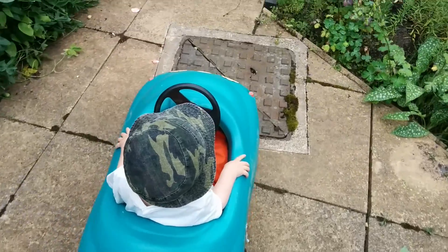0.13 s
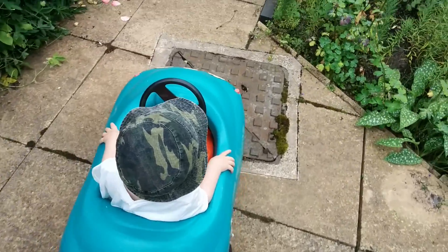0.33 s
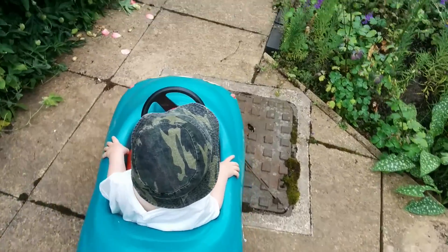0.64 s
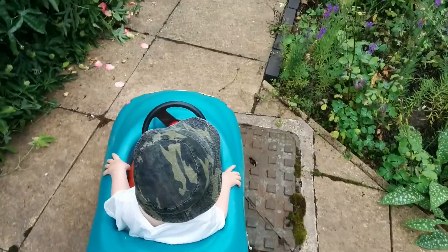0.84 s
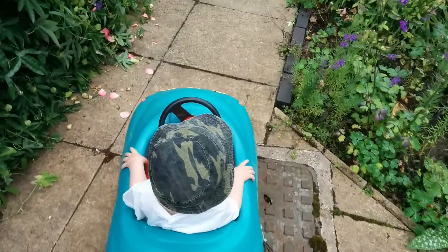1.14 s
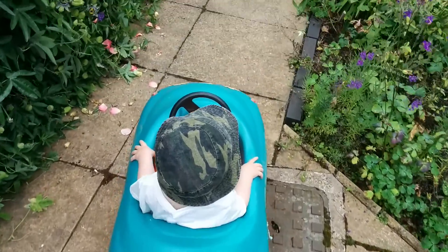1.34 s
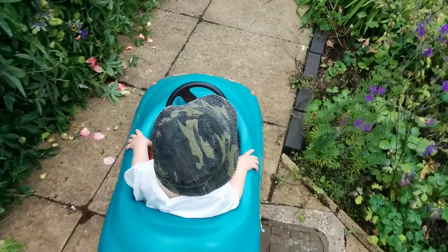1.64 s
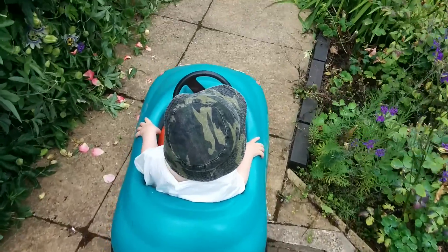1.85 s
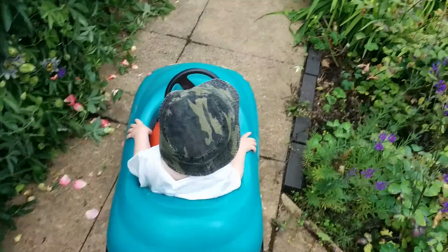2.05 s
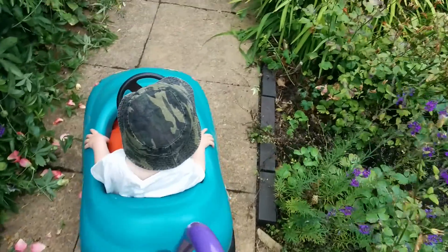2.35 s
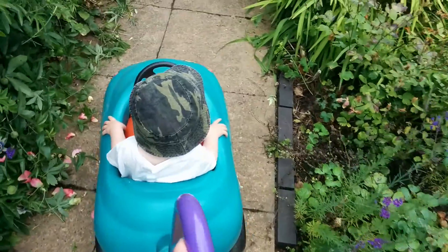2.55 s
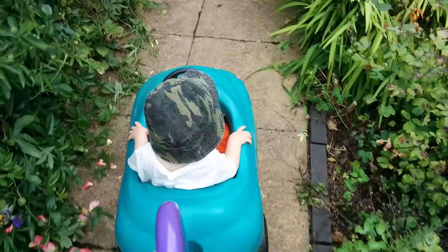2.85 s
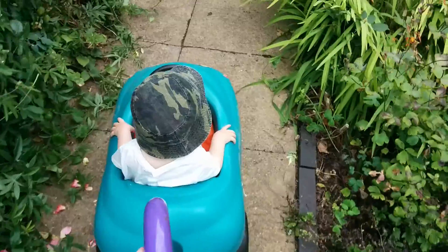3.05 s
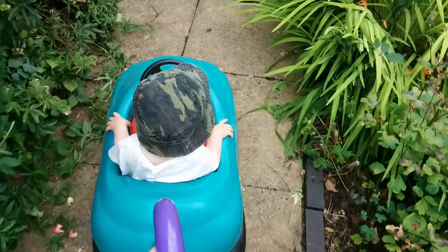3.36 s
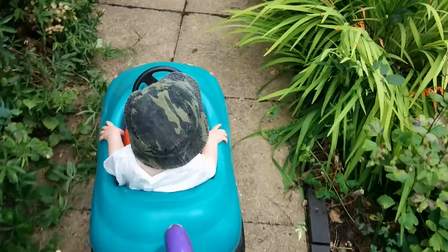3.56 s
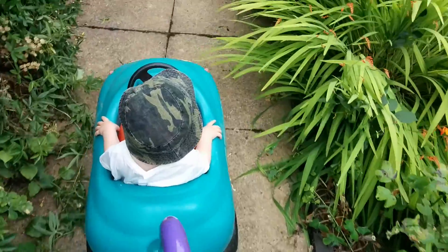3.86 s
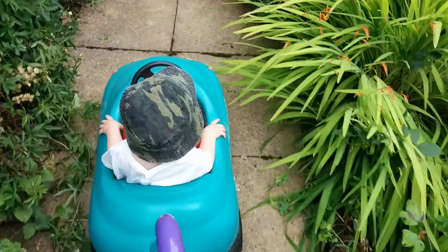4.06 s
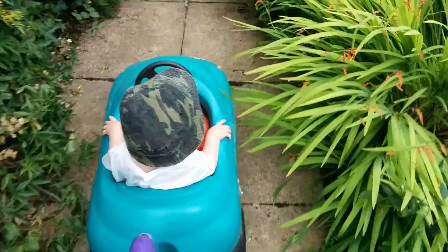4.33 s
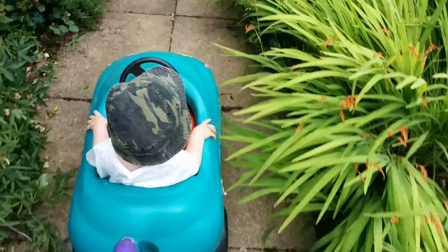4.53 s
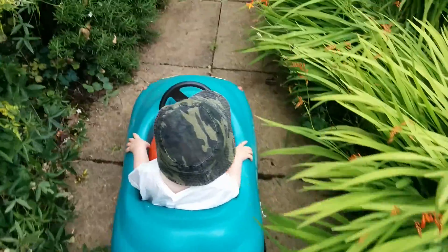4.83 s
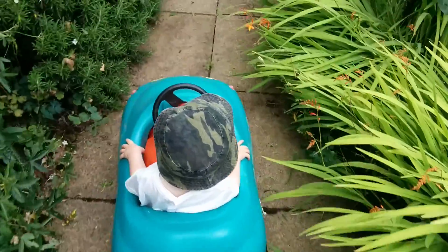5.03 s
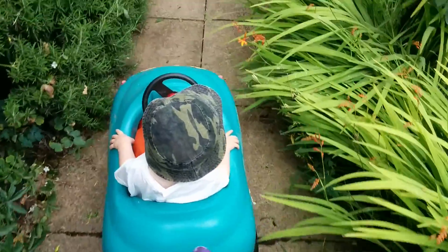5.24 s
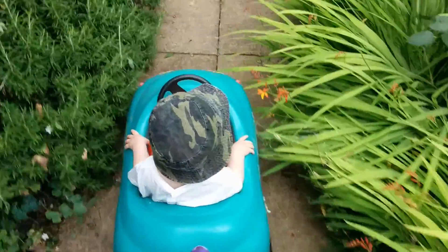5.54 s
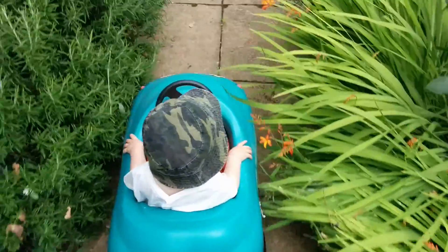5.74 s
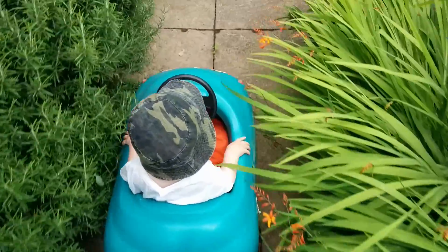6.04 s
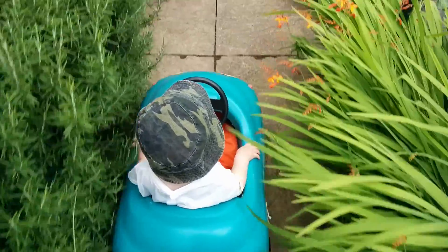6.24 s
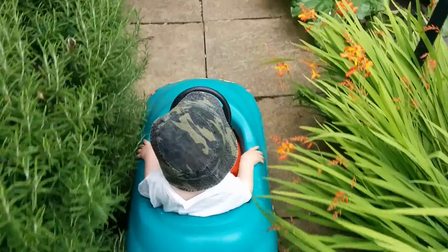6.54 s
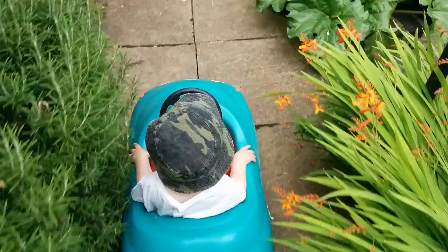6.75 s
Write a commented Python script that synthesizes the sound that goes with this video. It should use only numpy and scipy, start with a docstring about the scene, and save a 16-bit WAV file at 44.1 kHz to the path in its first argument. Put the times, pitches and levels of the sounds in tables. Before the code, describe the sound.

A hollow plastic toy car is pushed over rough garden paving, heard from just behind and above with no room echo. The wheels patter unevenly, thud into joints and crack bits of grit, while a dry axle rasps faintly. After a quieter, slower moment midway, the clattering resumes, and leaf blades brush the body with a fluttering, slightly singing hiss toward the end.

```python
"""A garden with concrete slabs in open air, no room; the microphone is just behind a child's ride-on push car.
Four hard plastic wheels chatter on rough stone, scuff and knock into joints: taps ring the hollow body, panels
and wheels as decaying modes and noise. An axle chafes as a wandering narrow band; sand grinds and grit cracks.
Long leaves brush the side as fluttering hiss, and resonances of the plastic sing."""
import sys
import numpy as np
from scipy import signal
from scipy.fft import rfft, irfft
from scipy.io import wavfile
from scipy.ndimage import uniform_filter1d

SR = 44100
rng = np.random.default_rng(int(sys.argv[2]) if len(sys.argv) > 2 else 0)


def wrap_up_sound(samples):
    """Save the sound to the file named by the first command line argument, as 16-bit audio."""
    columns = np.atleast_2d(samples).T
    # keep every value between -1 and 1, then stretch to whole-number steps
    tamed = np.clip(columns, -1, 1)
    steps = np.round(tamed * 32767).astype(np.int16)
    wavfile.write(sys.argv[1], SR, steps)


N = 303849
TIME = np.arange(N) / SR
RING = np.arange(10240) / SR  # time axis of one ring, s


def undb(db):
    """Decibels to gain."""
    return 10 ** (np.asarray(db) / 20)


def unit(x):
    """Scale to rms 1."""
    return x / np.sqrt(np.mean(x ** 2) + 1e-18)


def fade(t60):
    """A free decay of 60 dB in t60 seconds."""
    return np.exp(-np.log(1000) * RING / t60)


def add(out, start_s, sound):
    """Mix a sound in at start_s."""
    first = int(np.clip(start_s * SR, 0, N - 1))
    out[first:first + len(sound)] += sound[:N - first]


def spectrum(points, hz):
    """Read (Hz, dB) points on a log-frequency axis."""
    at_hz, level_db = np.transpose(points)
    return np.interp(np.log(hz), np.log(at_hz), level_db)


def noise(colour_db, lo_hz, hi_hz, size):
    """Rms 1 noise between two soft edges, coloured by a function from Hz to dB."""
    hz = np.arange(size // 2 + 1) * SR / size + 1e-3
    edges = np.sqrt(1 + (lo_hz / hz) ** 12 + (hz / hi_hz) ** 12)
    gain = undb(colour_db(hz)) / edges
    return unit(irfft(rfft(rng.standard_normal(size)) * gain, size))


def resonate(x, hz, width_hz):
    """One resonance, gain 1 at its centre."""
    return signal.lfilter(*signal.iirpeak(hz, hz / width_hz, fs=SR), x)


def wander(span_s):
    """A random wobble of rms 1, smoothed over span_s seconds."""
    return unit(uniform_filter1d(rng.standard_normal(N), max(int(span_s * SR), 1)))


def level(curve):
    """Gain along a (time_s, level_db) curve, silent outside it."""
    time_s, level_db = np.transpose(curve)
    inside = (TIME >= time_s[0]) * (TIME <= time_s[-1])
    return undb(np.interp(TIME, time_s, level_db)) * inside


PATCH_ATTACK_S, PATCH_RELEASE_S = 0.013, 0.013


def stretch(start_s, length_s):
    """How much of the wheels is on one stretch of stone, 0-1: a quick rise, a hold, a release."""
    corners_s = [-PATCH_ATTACK_S, 0, length_s, length_s + PATCH_RELEASE_S]
    return np.interp(TIME - start_s, corners_s, [0, 1, 1, 0])


# Clear modes of the moulded body, wheels and axles, undamped: pitch_hz [Hz], level_db [dB, relative],
# t60_s [s]
CAR_MODES = [(128.8, -2, 0.1), (155.7, -7, 0.31), (200.3, -2.5, 0.33), (241.3, 1, 0.33),
             (275.9, 14.5, 0.076), (298, 0, 0.16), (347.5, 12, 0.093), (396.4, -6, 0.29), (507, 18, 0.025),
             (589, 1, 0.16), (656.3, 2, 0.1), (740, 7.5, 0.089), (814, -0.5, 0.13), (1188, -3, 0.11),
             (1286, -7, 0.1), (1488, -1.5, 0.13), (1660, -3, 0.14), (1933, -2.5, 0.14), (2114, -6.5, 0.061),
             (2324, -19.5, 0.051), (2938, 1.5, 0.051), (3697, 15, 0.03), (5778, -2.5, 0.028),
             (6260, 6, 0.01), (7450, 3, 0.021)]
# The crowd of weaker modes between them: pitch_hz [Hz], density_db [dB per Hz, relative]
WEAK_MODES = [(40, -80), (75, -26), (130, -12), (260, -3), (400, -3), (600, -13), (1000, -14), (1900, -21),
              (2500, -26.5), (2900, -24), (3250, -25.5), (3700, -23), (4800, -36), (6300, -30.5),
              (8000, -32.5), (10500, -40), (16000, -32.5)]
# The parts of the car's voice, each one row: low_hz [Hz], high_hz [Hz], rise_s [s], t60_s [s, undamped],
# clear_share [power share of the clear modes, 0-1], patchiness_db [dB]
# the hollow body
BODY_PART = (35, 378, 0.0025, 0.15, 0.58, 2.6)
# the panels
PANEL_PART = (395, 1480, 0.00066, 0.1, 0.29, 2.8)
# the wheels
WHEEL_PART = (1520, 3420, 0.00049, 0.11, 0.14, 6.6)
# sand and grit
GRIT_PART = (3900, 12360, 0.00034, 0.046, 0.2, 3.5)


def strike(part, damping=1, centre_hz=2000, focus_db=0):
    """One part's answer to a tap; each contact point favours other modes. Rms 1 over the first 30 ms."""
    lo_hz, hi_hz, rise_s, t60_s, clear_share, patchy_db = part
    grid_hz = np.geomspace(60, 16000, 36)
    focus = np.exp(-(np.log2(grid_hz / centre_hz) / 0.18) ** 2)  # width in octaves
    favour_db = patchy_db * rng.standard_normal(len(grid_hz)) + focus_db * focus
    favour = np.column_stack([grid_hz, favour_db])

    modes = [mode for mode in CAR_MODES if lo_hz <= mode[0] < hi_hz]
    mode_hz, mode_db, mode_t60_s = np.transpose(modes)
    chance = rng.standard_normal((len(mode_hz), 2))
    detuned_hz = mode_hz * (1 + 0.014 * chance[:, 0])
    waves = np.sin(2 * np.pi * np.outer(detuned_hz, RING))
    strength = undb(mode_db + spectrum(favour, mode_hz)) * chance[:, 1]
    clear = strength @ (waves * fade(mode_t60_s[:, None] / damping))

    def crowd_db(hz):
        return spectrum(WEAK_MODES, hz) + spectrum(favour, hz)

    crowd = noise(crowd_db, lo_hz, hi_hz, len(RING)) * fade(t60_s / damping)
    clear_share = np.clip(clear_share, 0, 1)
    ring = np.sqrt(clear_share) * unit(clear) + np.sqrt(1 - clear_share) * unit(crowd)
    ring = ring * (1 - np.exp(-RING / rise_s))
    return ring / np.sqrt(np.mean(ring[:int(0.03 * SR)] ** 2))


def taps(count, spread_db):
    """Contacts at uneven moments, many light and a few hard: rows (time_s, size)."""
    chance = rng.random((count, 2))
    time_s = (np.arange(count) + 2 * chance[:, 0] - 1) * N / SR / count
    size = undb(-spread_db * np.log(np.maximum(chance[:, 1], 0.02)))
    return np.column_stack([time_s, size])


def chatter(part, contacts, skip_s, even_s):
    """The wheel skips four times at each contact; dividing by the local rms keeps the strength even."""
    spots = [strike(part) for _ in range(36)]
    sound = np.zeros(N)
    for time_s, size in contacts:
        ring = spots[rng.integers(len(spots))]
        for delay, push in rng.standard_normal((4, 2)):
            add(sound, time_s + skip_s * delay, size * push * ring)
    power = uniform_filter1d(sound ** 2, int(even_s * SR))
    return sound / np.sqrt(np.abs(power) + np.mean(power) / 100)


def rub(colour, flutter_db, swell_db):
    """Sliding friction: a hiss of countless tiny slips that flutters quickly and swells as grip changes."""
    grip_db = flutter_db * wander(0.00244) + swell_db * wander(0.02)
    hiss = noise(lambda hz: spectrum(colour, hz), 500, 17400, N)
    return unit(hiss * undb(grip_db))


# Coarse patches of stone under the wheels: start_s [s], length_s [s], lift_db [dB],
# extra_clatter_db [dB, from sharp stones], extra_sand_db [dB]
COARSE_PATCHES = [(0.26, 0.053, -2, 9.5, 16), (0.475, 0.1, 3, 5.5, 4), (0.65, 0.13, 8, 5.5, -1),
                  (1.184, 0.066, 6, 4, 8.5), (1.317, 0.057, -0.5, 12.5, 7), (1.397, 0.066, 3, 5.5, 8),
                  (1.615, 0.099, 5, 0.5, 3), (2.236, 0.087, 7, -9, 1.5), (2.457, 0.022, 4, -6, 1.5),
                  (2.66, 0.21, 8.5, -5, 1.5), (2.896, 0.12, 18, -2.5, -3.5), (3.032, 0.13, 5, -3, 5.5),
                  (3.325, 0.065, 6, 2.5, 9.5), (3.748, 0.026, 6, 1.5, -28), (4.12, 0.05, 8, -3.5, 0),
                  (4.401, 0.19, 8, 0.5, 0.5), (4.719, 0.034, 8, 6.5, -4), (4.875, 0.044, 9, 1, -5.5),
                  (5.115, 0.069, 11, -7, -24), (5.291, 0.1, 3, 5, 7), (5.468, 0.14, 2.5, 4.5, 0.5),
                  (5.567, 0.11, 6, -2.5, 3.5), (5.936, 0.054, 2, 2, 4), (6.001, 0.079, 5, 2, -3.5),
                  (6.257, 0.11, 1.5, 4.5, -6), (6.526, 0.11, 7, 0, -2), (6.8, 0.03, -1.5, 9, 9.5)]
# Smooth stretches where the wheels glide, mostly quieter: start_s [s], length_s [s], change_db [dB]
SMOOTH_STRETCHES = [(0.626, 0.072, 1.5), (0.863, 0.043, -7), (2.157, 0.024, -10.5), (2.395, 0.073, -8.5),
                    (2.862, 0.017, -11), (3.152, .11, -12.5), (3.549, 0.019, -6), (3.805, 0.0082, -4.5),
                    (4.024, 0.031, -6), (4.63, 0.06, -5.5), (5.108, 0.039, -7), (5.381, .035, -6.5),
                    (5.652, 0.069, -7.5), (5.825, 0.085, -4.5), (6.471, 0.017, -9), (6.748, 0.033, -6.5)]


def surface():
    """Coarse patches shake the car harder, smooth ones mostly calm it: dB for body, clatter and sand."""
    smooth_db = sum(change_db * stretch(start_s, length_s)
                    for start_s, length_s, change_db in SMOOTH_STRETCHES)
    body_db, clatter_db, sand_db = np.tile(smooth_db, (3, 1))
    for start_s, length_s, lift_db, sharp_db, sandy_db in COARSE_PATCHES:
        on = stretch(start_s, length_s)
        body_db += on * lift_db
        clatter_db += on * (lift_db + sharp_db)
        sand_db += on * (lift_db + sandy_db)
    return body_db, clatter_db, sand_db


LIGHT_FROM_DB = -11  # a panel knock this loud at a steady walk gives just dip_db, a louder one more


def contact(gap_s, dip_db, return_s):
    """A wheel runs light as it spans a joint: longer when the car is slow, deeper when it lands harder."""
    load_db = np.zeros(N)
    at_s, push_db, _ = np.transpose(PUSH)
    for time_s, panel_db, *_ in JOINT_KNOCKS:
        slow_db = CRUISE_DB - np.interp(time_s, at_s, push_db)
        span_s = gap_s * undb(0.5 * slow_db)
        depth_db = dip_db * undb(0.47 * (panel_db + slow_db - LIGHT_FROM_DB))
        side_s = np.where(TIME < time_s, span_s, return_s)
        dip = np.exp(-((TIME - time_s) / side_s) ** 4)
        load_db = np.minimum(load_db, depth_db * dip)  # the deepest dip wins
    return undb(load_db)


# drift is a fraction of the pitch
AXLE_HZ, AXLE_WIDTH_HZ, AXLE_DRIFT, AXLE_SPURT_DB, AXLE_WOBBLE_S = 6100, 760, 0.024, 7, 0.035


def axle():
    """Tiny slips ring the dry axle; pitch and pressure wander with the wobble of the wheel. Rms 1."""
    slips = noise(np.zeros_like, 0.91, AXLE_WIDTH_HZ / 2, N)
    hz = AXLE_HZ * (1 + AXLE_DRIFT * wander(AXLE_WOBBLE_S))
    pressure = undb(AXLE_SPURT_DB * np.minimum(wander(AXLE_WOBBLE_S), 1))
    return unit(slips * np.sin(2 * np.pi * np.cumsum(hz) / SR) * pressure)


BOOM_DB, PANEL_DB, WHEEL_DB, SAND_DB = -1.5, -8.5, -12.5, -1  # trim of each part
CRUISE_DB, CLATTER_GROWTH = -24.5, 0.85  # push at a steady walk; dB of clatter for each dB of push
# slow wheels favour the lowest modes: their band, and dB gained for each dB below the steady walk
DEEP_HZ, DEEPENING = (111, 194), 0.73
# The push speeding up and slowing: time_s [s], push_db [dB, before trims and surface],
# sand_db [dB under the wheels, before trim and surface]
PUSH = [(0.0, -26.5, -40.5), (0.33, -29, -50.5), (0.77, -42, -53), (1.06, -30.5, -52.5), (1.3, -29.5, -51),
        (1.82, -28, -38), (2.4, -32.5, -46.5), (2.78, -46.5, -60.5), (3.24, -46.5, -61.5),
        (3.55, -28, -44.5), (4.43, -27, -46), (4.62, -31, -40.5), (5.08, -28, -41), (5.3, -29, -47),
        (5.43, -24.5, -43), (6.43, -27.5, -39.5), (6.72, -26, -47), (6.89, -28, -50.5)]


def rolling():
    """Hard wheels patter over the stone, the axles rasp in their sockets and sand ticks underneath."""
    time_s, *columns = np.transpose(PUSH)
    push_db, sand_db = (np.interp(TIME, time_s, column) for column in columns)
    body_lift_db, clatter_lift_db, sand_lift_db = surface()
    clatter_db = CRUISE_DB + CLATTER_GROWTH * (push_db - CRUISE_DB) + clatter_lift_db
    grit_db = sand_db + sand_lift_db

    bumps = taps(count=380, spread_db=3.5)
    thuds = taps(count=270, spread_db=2.0)  # the body thuds at its own, sparser moments
    boom = chatter(BODY_PART, thuds, skip_s=0.003483, even_s=0.068)
    deep_band = signal.butter(2, DEEP_HZ, "band", fs=SR, output="sos")
    bass = signal.sosfiltfilt(deep_band, boom)
    boom = boom - bass + bass * undb(DEEPENING * (CRUISE_DB - push_db))
    boom = boom * undb(push_db + body_lift_db + BOOM_DB)

    panel = chatter(PANEL_PART, bumps, skip_s=0.003953, even_s=0.027) * undb(clatter_db + PANEL_DB)
    wheel = chatter(WHEEL_PART, bumps, skip_s=0.004, even_s=0.033) * undb(clatter_db + WHEEL_DB)
    grains = taps(count=1300, spread_db=6.5)
    sand = chatter(GRIT_PART, grains, skip_s=0.0018, even_s=0.066) * undb(grit_db + SAND_DB)
    # the rasp swells less than the sand, so it stands out when the car runs gently
    rasp = axle() * undb(0.8 * grit_db - 14)
    load = contact(gap_s=0.028, dip_db=-3.0, return_s=0.0092)
    return (boom + panel + wheel + sand + rasp) * load


def garden():
    """Faint outdoor air: steady noise, strongest in the bass."""
    air = [(30, 4), (150, -4), (1000, -52), (16000, -27)]  # (Hz, dB per Hz)
    return undb(-57) * noise(lambda hz: spectrum(air, hz), 20, 17000, N)


# Steered wheels grinding sideways over sand: time_s [s], level_db [dB]
SAND_GRIND = [(0, -36.5), (.12, -41.5), (.225, -39.5), (.26, -30), (.35, -36), (.43, -38), (.5, -74)]
# Pinches of fine sand crushed with a soft fizz: start_s [s], length_s [s], level_db [dB]
SAND_FIZZES = [(0.712, .02, -37.5), (1.033, 0.026, -56), (2.647, 0.023, -52), (2.736, 0.0096, -52),
               (2.82, 0.015, -54), (3.37, .02, -50), (3.616, .025, -37), (3.77, 0.016, -42),
               (4.216, 0.0068, -46), (4.555, 0.035, -54), (4.646, .012, -35), (4.97, .015, -58),
               (5.048, 0.0075, -44.5), (5.43, 0.014, -48)]


def sliding():
    """Sand grinds coarsely under the steered wheels, and the finest of it fizzes."""
    # both (Hz, dB per Hz)
    sand = [(1000, 0.5), (3500, 2), (4800, 0.5), (6500, 2.0), (10000, -20), (16000, -18)]
    dust = [(1000, -40), (4800, -18), (7000, 4), (10000, -2), (16000, -4)]
    crush = sum(undb(level_db) * stretch(start_s, length_s) for start_s, length_s, level_db in SAND_FIZZES)
    grind = rub(sand, flutter_db=4.0, swell_db=-1.5) * level(SAND_GRIND)
    fizz = rub(dust, flutter_db=7.0, swell_db=-2.5) * crush
    return grind + fizz


SAND_RISE_S = 0.0041  # sand is crushed a moment after a wheel lands
# A wheel hits a joint or a bump: start_s [s], panel_db, boom_db, wheel_db [dB, before part trims],
# clack_hz [Hz, centre of the wheel clack]
JOINT_KNOCKS = [(0.048, -31, -23, -28, 1420), (0.236, -12, -21, -26, 1570), (0.261, -19, -19, -21, 1640),
                (0.404, -23.5, -31, -27.5, 1670), (0.454, -11.5, -23, -24.5, 1770),
                (0.519, -57, -18, -28, 1860), (0.666, -35, -22.5, -24.5, 1690),
                (0.702, -20.5, -47, -21, 2960), (0.811, -26.5, -36.5, -39, 1880),
                (0.882, -33, -28, -35.5, 3430), (0.933, -57, -23, -50, 3540),
                (0.975, -20.5, -23, -47, 1540), (1.097, -9.5, -18.5, -18, 1250),
                (1.131, -24, -25, -25, 1740), (1.167, -14, -23, -24.5, 1750),
                (1.186, -20, -16.5, -19.5, 1570), (1.23, -30, -24, -36, 1500),
                (1.288, -19.5, -27, -27.5, 2650), (1.312, -25, -16, -27, 3800),
                (1.424, -14, -18, -19, 1570), (1.439, -13, -13, -19, 1480), (1.542, -6, -16.5, -14.5, 1660),
                (1.589, -34, -26, -27.5, 1920), (1.655, -18, -22, -20, 2080),
                (1.673, -9.5, -19.5, -18, 2130), (1.709, -20.5, -25, -21, 1600),
                (1.753, -18.5, -22, -29.5, 3580), (1.82, -19.5, -20.5, -52, 1720),
                (1.881, -7, -15, -18.5, 1800), (1.993, -15.5, -18, -17.5, 1380),
                (2.086, -12.5, -20, -21.5, 1900), (2.22, -7, -18.5, -15.5, 1640),
                (2.275, -15.5, -27.5, -18.5, 2160), (2.444, -23, -32.5, -22.5, 1950),
                (2.461, -12.5, -23, -43, 1870), (2.653, -30, -28, -36.5, 2980),
                (2.902, -15, -28.5, -22, 2280), (3.038, -24, -38, -31.5, 1910),
                (3.411, -19.5, -32, -31, 1840), (3.6, -19.5, -24.5, -30, 1730),
                (3.671, -25, -36, -31, 1600), (3.69, -18, -18.5, -36, 1640), (3.832, -23, -25, -31, 1670),
                (3.872, -13.5, -24, -46, 1720), (3.92, -14, -26.5, -55, 1430), (4.004, -13, -20, -23, 2000),
                (4.102, -18, -21.5, -24, 2500), (4.127, -30, -28, -24.5, 1800),
                (4.28, -19, -21.5, -31, 1690), (4.42, -14.5, -35, -21.5, 1730),
                (4.446, -21, -33, -24, 1970), (4.513, -15, -21, -47, 2080), (4.579, -21, -20, -34, 1600),
                (4.694, -31, -24.5, -28, 2000), (4.771, -6.5, -21, -22.5, 2070),
                (4.859, -22, -22, -42, 1950), (4.895, -32, -20, -23.5, 2460),
                (4.926, -17, -23, -27.5, 2380), (5.037, -21.5, -41, -31, 1570),
                (5.13, -20.5, -25.5, -56, 1600), (5.165, -19, -23, -30, 2160), (5.23, -38, -22, -32, 1880),
                (5.298, -13.5, -23, -33, 1570), (5.351, -23, -31, -29.5, 1650),
                (5.484, -23, -43, -24, 1500), (5.563, -13, -16.5, -21.5, 1500),
                (5.587, -38, -36, -16, 1630), (5.775, -17.5, -22.5, -29.5, 1920),
                (5.914, -25, -19.5, -43, 1480), (5.949, -32, -21, -22, 3080), (6.037, -9.5, -19, -23, 3000),
                (6.266, -13.5, -17, -22.5, 2100), (6.356, -17, -24, -48, 2900),
                (6.416, -19.5, -25, -55, 3700), (6.447, -36, -23, -50, 1800),
                (6.544, -15.5, -19.5, -21.5, 2980), (6.651, -12.5, -16, -29, 1890),
                (6.705, -8, -14, -15.5, 1840), (6.797, -30, -25.5, -32, 1780),
                (6.845, -12.5, -46, -39, 1720)]


def knocks():
    """A wheel touches a joint's edge, lands and bounces softly; wheel, panels and body ring each time."""
    out = np.zeros(N)
    for start_s, panel_db, boom_db, wheel_db, clack_hz in JOINT_KNOCKS:
        blow = undb(boom_db - 3.0) * strike(BODY_PART)
        blow += undb(panel_db - 12.5) * strike(PANEL_PART)
        blow += undb(wheel_db - 7.5) * strike(WHEEL_PART, centre_hz=clack_hz, focus_db=11.5)
        sand = strike(GRIT_PART, damping=0.77) * (1 - np.exp(-RING / SAND_RISE_S))
        blow += undb(wheel_db - 24) * sand
        touch = (-rng.uniform(0.00193, 0.006), -17)  # (delay s, dB)
        bounce = (rng.uniform(0.011, 0.038), -11)
        for delay_s, blow_db in (touch, (0, 0), bounce):
            add(out, start_s + delay_s, undb(blow_db) * blow)
    return out


CRUMBLE_S = 0.0029  # spacing of the two small snaps before the burst
SPLINTER_DB, SPLINTER_T60_S = -17, 0.04  # trim and decay of the glassy top
# A grain of grit cracks under a wheel: start_s [s, the burst], level_db [dB, before trim],
# top_db [dB of its glassy top, before trim]
GRIT_CRACKS = [(0.1162, -23.5, -50), (0.189, -24, -35), (0.431, -19.5, -49), (1.0992, -17, -46),
               (1.186, -18, -53), (1.3125, -9.5, -31), (1.3552, -19, -40), (1.4411, -18.5, -46),
               (1.631, -17.5, -47), (1.6748, -13, -49), (1.873, -17, -27), (2.2178, -17.5, -37),
               (2.903, -28, -58), (2.923, -25.5, -46), (3.1824, -25.5, -26.5), (3.261, -28, -36.5),
               (3.552, -26, -34.5), (3.7547, -19, -51), (3.773, -23, -39), (4.002, -23, -42),
               (4.1758, -21.5, -31), (4.742, -17.5, -31), (5.281, -21.5, -28), (5.5934, -16.5, -49),
               (6.052, -12.5, -51)]


def cracks():
    """Grit crumbles, then bursts in a short bright snap that ticks the wheel, with splinters on top."""
    out = np.zeros(N)
    for start_s, level_db, top_db in GRIT_CRACKS:
        for delay_s, snap_db in ((-2 * CRUMBLE_S, -19), (-CRUMBLE_S, -10), (0, 0)):
            snap = strike(GRIT_PART, damping=0.5, centre_hz=12000, focus_db=-14.5)
            tick = strike(WHEEL_PART, damping=2.0, centre_hz=3480, focus_db=16)
            snap = snap + undb(-3.0) * tick
            splinter = unit(noise(np.zeros_like, 5400, 18000, len(RING)) * fade(SPLINTER_T60_S))
            crack = undb(level_db - 15.0) * snap + undb(top_db + SPLINTER_DB) * splinter
            add(out, start_s + delay_s, undb(snap_db) * crack)
    return out


# A wheel slips sideways with a squeaky scuff: start_s [s], peak_db [dB, before a 0.5 dB lift],
# pitch_hz [Hz, centre], length_s [s, of the slipping]
WHEEL_SCUFFS = [(2.141, -23, 2720, 0.011), (2.389, -31, 1680, 0.013), (2.542, -25, 1750, 0.047),
                (2.589, -21.5, 3050, 0.018), (2.896, -13.5, 2350, 0.01), (3.099, -24.5, 1800, 0.022),
                (3.744, -23, 2560, 0.015), (4.97, -24, 3020, 0.038), (5.1585, -16, 2210, 0.041),
                (5.208, -22, 1710, 0.031), (6.657, -21, 2200, 0.012)]


def scuffs():
    """Plastic sticks and slips on the stone: a swell of quick taps on one spot of the wheel."""
    out = np.zeros(N)
    for start_s, peak_db, pitch_hz, length_s in WHEEL_SCUFFS:
        swell = np.sin(np.pi * np.minimum(RING / length_s, 1))
        slips = (rng.random(len(RING)) < 900 / SR) * swell  # 900 slips a second on average
        spot = strike(WHEEL_PART, damping=2.2, centre_hz=pitch_hz, focus_db=12)
        squeak = signal.fftconvolve(slips, spot)
        add(out, start_s, undb(peak_db + 0.5) * squeak / np.abs(squeak).max())
    return out


# Long leaves sliding along the body, first tips, then the whole clump: time_s [s], level_db [dB of hiss]
LEAF_HISS = [(3.93, -70), (4.0, -49), (4.2, -60), (4.32, -69), (4.44, -48), (4.66, -46), (4.7, -52),
             (4.9, -63), (5.06, -50), (5.12, -67), (5.26, -70), (5.3, -46), (5.6, -48), (5.72, -47.5),
             (5.9, -48), (5.96, -40), (6.07, -43.5), (6.3, -45), (6.58, -44.5), (6.7, -68), (6.89, -57)]
# The plastic side singing under hard-pressed leaves: time_s [s], level_db [dB]
SIDE_SINGING = [(5.3, -57), (5.55, -40), (5.72, -49.5), (5.9, -51), (6.0, -38), (6.2, -40.5), (6.33, -42),
                (6.48, -42), (6.6, -42), (6.7, -67)]
# Resonances of the rubbed side: pitch_hz [Hz], width_hz [Hz, half of each filter pass],
# level_db [dB, relative]
SIDE_MODES = [(2910, 110, 0.5), (3640, 100, 2)]


def leaves():
    """Blade after blade slides over the plastic with an uneven rustle and bows the side panel."""
    # (Hz, dB per Hz)
    blades = [(1000, -25), (3500, -20), (4800, -28), (6200, -8.5), (7600, 19.5), (10500, 7.5), (16000, 5)]
    rustle = rub(blades, flutter_db=3, swell_db=2.2)
    drag = rub(WEAK_MODES, flutter_db=3, swell_db=2.5)
    side = np.zeros(N)
    for pitch_hz, width_hz, level_db in SIDE_MODES:
        once = resonate(drag, pitch_hz, 2 * width_hz)
        twice = resonate(once, pitch_hz, 2 * width_hz)
        side += undb(level_db) * unit(twice)
    return rustle * level(LEAF_HISS) + unit(side) * level(SIDE_SINGING)


def scene():
    """The car on the path, in still air."""
    car = rolling() + knocks() + scuffs() + cracks() + sliding()
    return (car + leaves() + garden())[None]


LOW_CUT_HZ, TOP_HZ = 56, 15800
HOLLOW_HZ, HOLLOW_WIDTH_HZ, HOLLOW_DB = 4510, 1400, -2  # a hollow in the microphone's response
# Narrow resonances of the microphone port: pitch_hz [Hz], width_hz [Hz], boost_db [dB]
MICROPHONE_PORT = [(14120, 75, 12), (14475, 80, 11.5)]


def record(dry):
    """The microphone thins deep bass, hollows the low treble, rings faintly in its port, cuts the top."""
    low_cut = signal.butter(3, LOW_CUT_HZ, "high", fs=SR, output="sos")
    sound = signal.sosfilt(low_cut, dry)
    for pitch_hz, width_hz, boost_db in [*MICROPHONE_PORT, (HOLLOW_HZ, HOLLOW_WIDTH_HZ, HOLLOW_DB)]:
        sound = sound + (undb(boost_db) - 1) * resonate(sound, pitch_hz, width_hz)
    top_cut = signal.ellip(10, 0.2, 70, TOP_HZ, fs=SR, output="sos")
    return signal.sosfilt(top_cut, sound)


dry = scene()
out = record(dry)
wrap_up_sound(out)
```